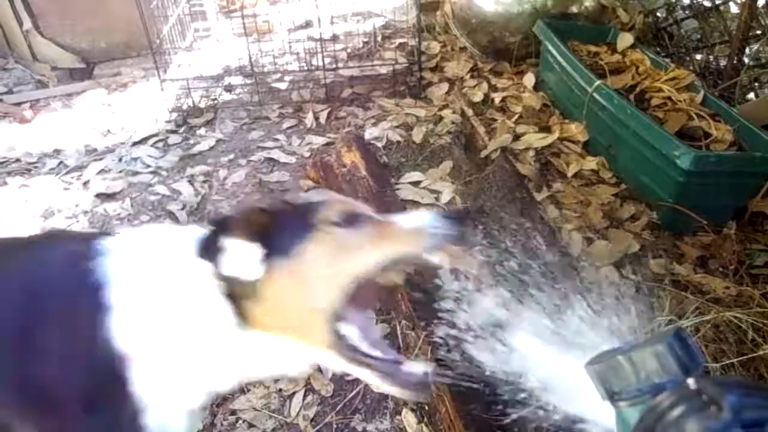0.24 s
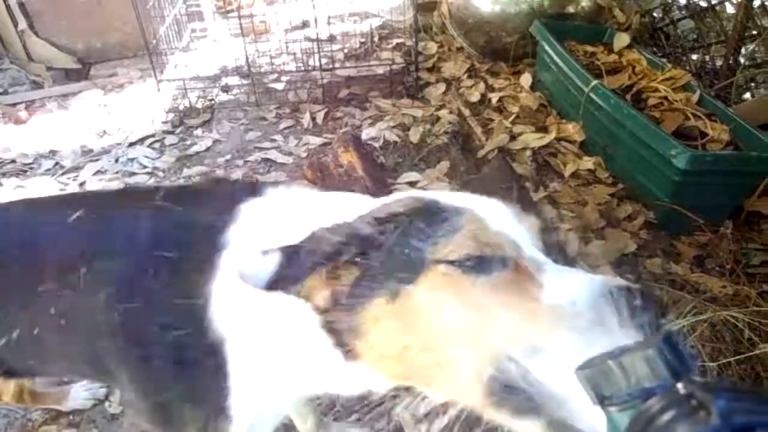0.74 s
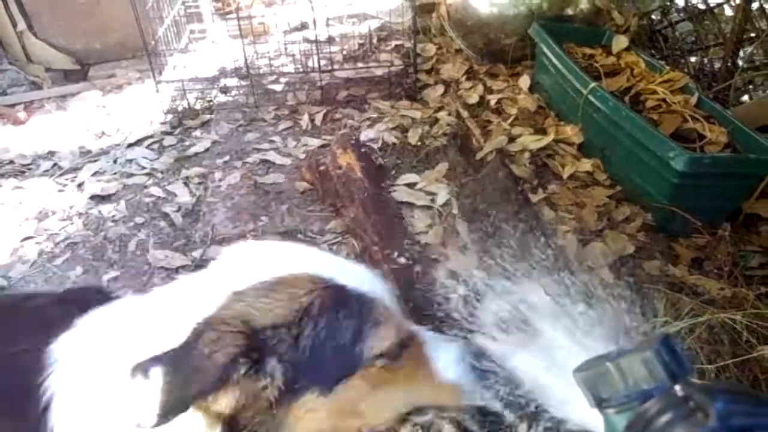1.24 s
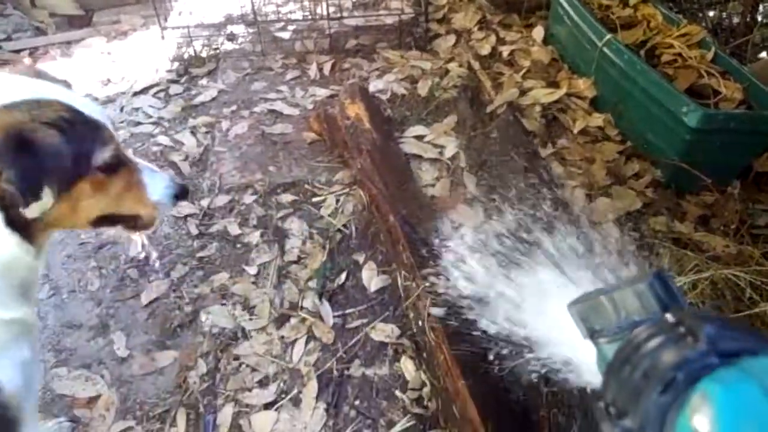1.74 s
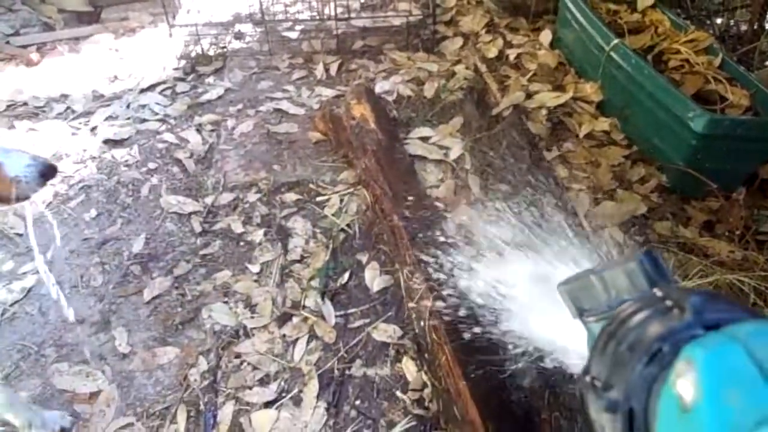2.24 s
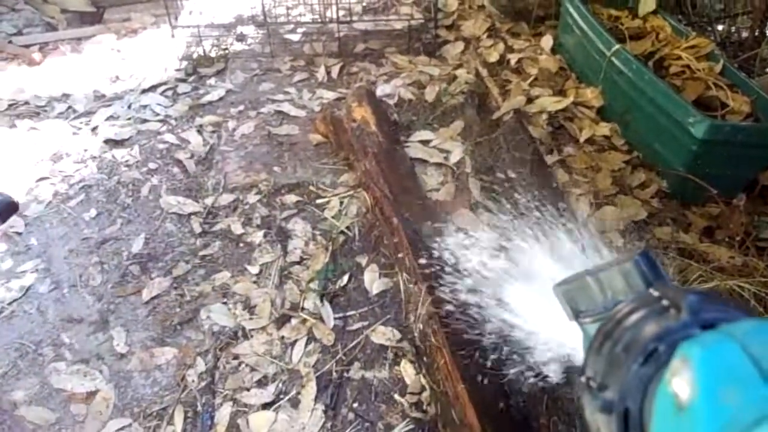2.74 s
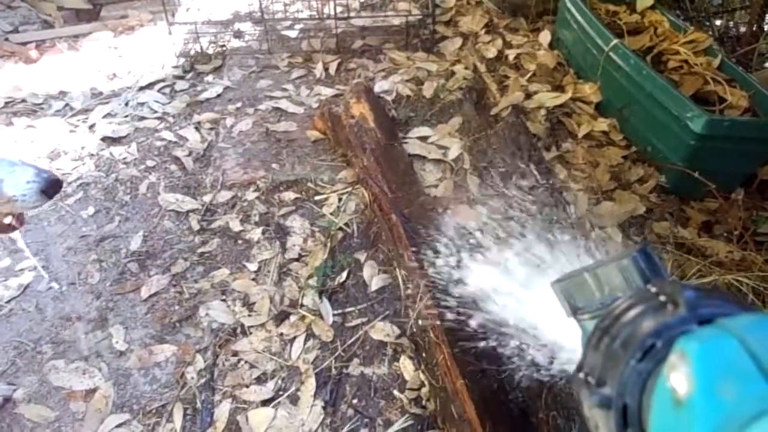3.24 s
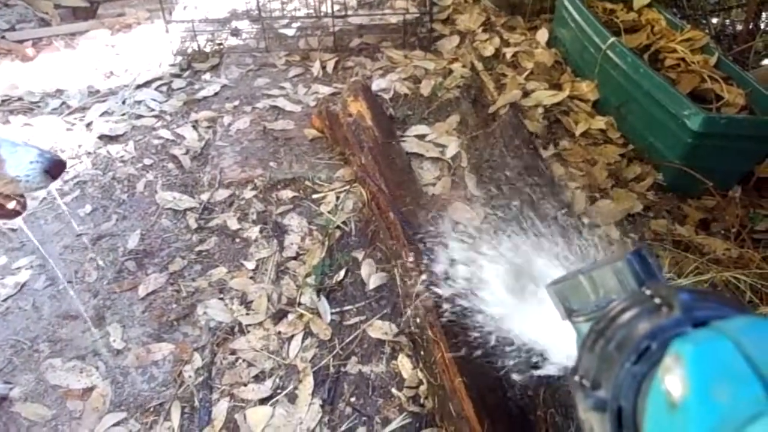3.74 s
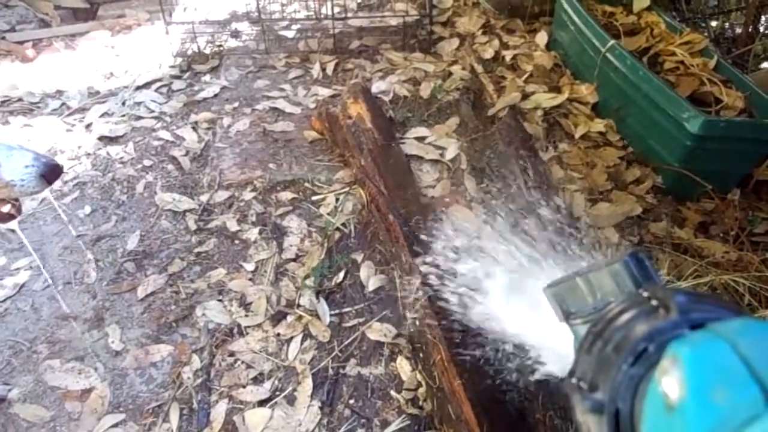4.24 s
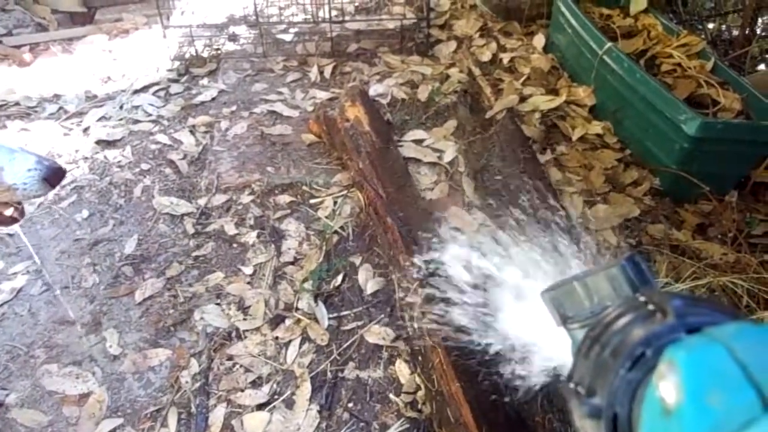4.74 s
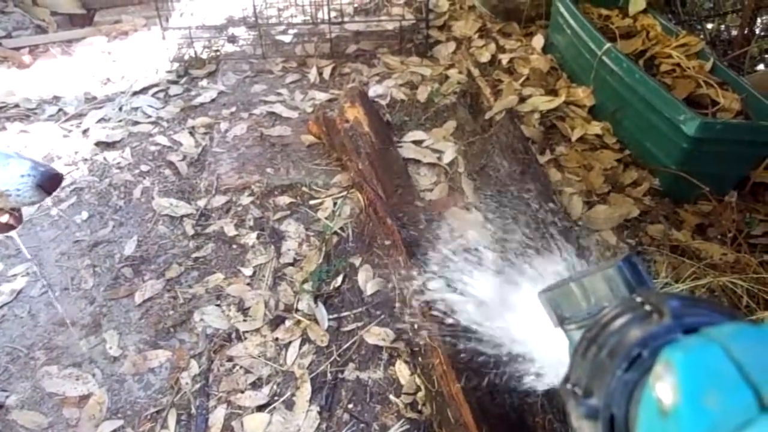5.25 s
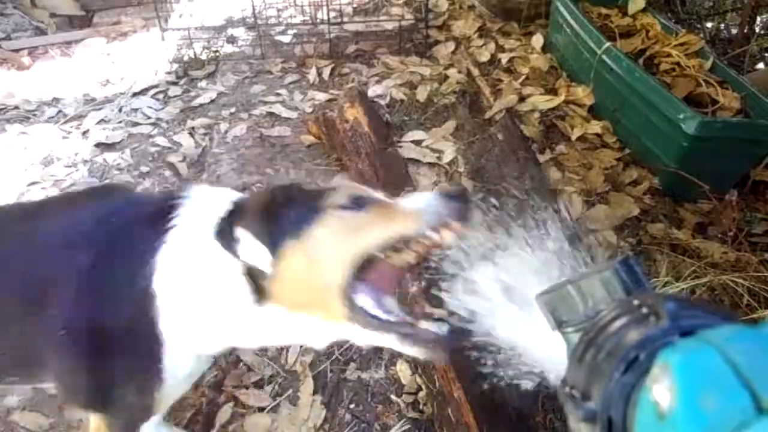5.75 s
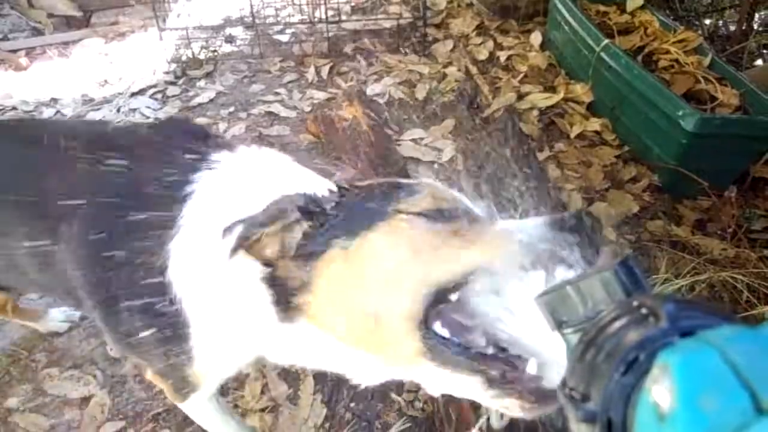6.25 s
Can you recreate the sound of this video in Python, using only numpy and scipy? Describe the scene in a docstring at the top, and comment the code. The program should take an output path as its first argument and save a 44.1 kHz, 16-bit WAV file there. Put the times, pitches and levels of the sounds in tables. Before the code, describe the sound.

Close outdoors, a garden hose nozzle sprays continuously with a bright, sputtering hiss. Droplets crackle on dry leaves and patter dully on soil, with little puddle gurgles. Near the start a dog bites the stream, making low drumming, splashes and a wet snap; after a long stretch of spray alone, it lunges again at the end. Close stereo microphone, no echo.

```python
"""Outdoors, close to a garden hose nozzle that sprays onto dead leaves and wet soil.
The jet sputters: random clumps of tiny blows ring the nozzle's resonances over a hiss.
Filtered blows make droplets crackle on leaves and patter on soil; rising tones gurgle in a puddle.
Twice a dog lunges into the spray: low noise drums in its open mouth, and its jaws snap shut
with short bursts of splash and thud."""
import sys
import numpy as np
from scipy import signal
from scipy.fft import rfft, irfft
from scipy.io import wavfile
from scipy.ndimage import uniform_filter1d

SR = 44100
rng = np.random.default_rng(int(sys.argv[2]) if len(sys.argv) > 2 else 0)


def transcribe(signal):
    """Save signal, clipped to [-1, 1], as a 16-bit WAV file at the path in sys.argv[1]."""
    frames = np.atleast_2d(signal).T
    limited = np.clip(frames, -1, 1)
    pcm = np.round(limited * 32767).astype(np.int16)
    wavfile.write(sys.argv[1], SR, pcm)


N = 285768
T = np.arange(N) / SR  # time of every sample, seconds
HZ = np.fft.rfftfreq(N, 1 / SR)  # frequencies in the spectrum

# how strongly water lands on the soil, before each layer's own adjustment: (time [s], level [dB])
SOIL_LEVEL = [(0.0, -43.5), (1.32, -49.5), (1.71, -44.5), (4.0, -49.5), (4.19, -47.5), (4.96, -53),
              (5.56, -54), (5.96, -53.5), (6.48, -52.5)]


def undb(db):
    """Turn decibels into a gain."""
    return 10 ** (np.asarray(db) / 20)


def unit(x):
    """Scale to an average strength (rms) of 1."""
    return x / np.sqrt(np.mean(x ** 2))


def curve(rows):
    """Turn rows (time [s], level [dB]) into a gain for every sample, with rounded corners."""
    gain = undb(np.interp(T, *np.transpose(rows)))
    return uniform_filter1d(gain, int(0.03 * SR))


def walk(rate):
    """A random wander: about rate new levels a second, smoothed twice and scaled to rms 1."""
    hold = int(SR / rate)  # samples per level
    held = rng.standard_normal(N // 20)[np.arange(N) // hold]
    smooth = uniform_filter1d(held, hold)
    return unit(uniform_filter1d(smooth, hold // 2))


def colour(x, points):
    """Filter to the spectrum (frequency [Hz], level [dB]), with no sound ahead of its cause; rms 1."""
    hz, db = np.transpose(points)
    log_gain = np.log(undb(np.interp(np.log(HZ + 1), np.log(hz), db)))
    # folding the cepstrum onto positive times makes the filter respond only after each blow
    cepstrum = irfft(log_gain, N)
    cepstrum[1:N // 2] *= 2
    cepstrum[N // 2 + 1:] = 0
    response = np.exp(rfft(cepstrum))
    return unit(irfft(rfft(x) * response, N))


def ring(x, hz, width_hz):
    """One resonance, with gain 1 at its centre; a narrow one rings longer."""
    damping = 1j * HZ * width_hz
    return irfft(rfft(x) * damping / (hz ** 2 - HZ ** 2 + damping), N)


def impacts(rate, spread_db):
    """Random tiny blows, about rate a second; most are small and a few large."""
    chance = rng.random(N)
    size = np.minimum(rng.standard_normal(N), 2.5)
    sign = rng.choice([-1, 1], N)
    return unit((chance < rate / SR) * sign * undb(spread_db * size))


def place(x, right_db, lag_samples=0, above_hz=0):
    """Left-right placing: pitches over above_hz are right_db louder at the right and later at the left."""
    share = 1 / (1 + (above_hz / (HZ + 1)) ** 16)  # how fully each pitch is affected
    difference = np.log(undb(right_db)) + 2j * np.pi * HZ * lag_samples / SR
    half = np.exp(share * difference / 2)
    return irfft(rfft(x) * np.array([1 / half, half]), N)


def bursts(rows, attack_s, release_s, sag_db_per_s=0, height=undb):
    """Rows (start s, length s, dB) that rise, hold or sag, and fall; a gain, or dB with height=float."""
    out = np.zeros(N)
    for start, length, db in rows:
        span = slice(max(int(start * SR), 0), int((start + length + release_s) * SR))
        age = T[span] - start
        rise = age / attack_s
        fall = 1 - (age - length) / release_s
        shape = np.clip(np.minimum(rise, fall), 0, 1)
        sag = undb(-sag_db_per_s * (age - length / 2))
        out[span] += height(db) * shape * sag
    return out


def rumble():
    """Low rush of the flow: deep noise, a little stronger when more water reaches the ground."""
    # spectrum of the rush: (frequency [Hz], level [dB])
    rumble_colour = [(12, -18), (28, 0.5), (42, 2.5), (55, -3), (73, -0.5), (95, -4), (160, -7.5),
                     (300, -7.5), (600, -15), (2000, -60)]
    rush = 0
    for side in (-1, 1):
        noise = colour(rng.standard_normal(N), rumble_colour)
        rush = rush + place(noise, right_db=0.9 + 2.6 * side)
    return unit(rush) * unit(curve(SOIL_LEVEL) ** 0.29) * undb(-53.0)


def bubble(hz, decay_s):
    """A bubble rings briefly, and its pitch climbs from hz as it nears the surface."""
    age = T[:3000]
    tone = np.sin(2 * np.pi * hz * age * (1 + 2.16 * age))
    onset = 1 - np.exp(-age / 0.00085)
    return tone * np.exp(-age / decay_s) * onset


def gurgles():
    """Trapped air rings as bubbles: large ones gulp now and then among many small ones."""
    # large bubbles in the puddle and the dog's mouth:
    # (time [s], starting pitch [Hz], level before onset and decay [dB])
    large = [(.079, 734, -33), (.118, 704, -39), (.918, 1190, -34), (1.025, 855, -38), (1.042, 1070, -39),
             (1.625, 803, -32.5), (2.028, 780, -35), (3.127, 685, -33.5), (3.27, 784, -36),
             (4.253, 887, -33), (6.258, 1190, -38), (6.296, 1190, -35)]
    count = 420  # small bubbles
    times = rng.uniform(0, T[-1], size=count)
    pitch, size = rng.standard_normal(size=(2, count))
    small_hz = 720 * np.exp(0.13 * pitch)
    # small bubbles grow louder where more water lands
    small_db = np.interp(times, *np.transpose(SOIL_LEVEL)) + 2.9 + 4.16 * size
    small = zip(times, small_hz, small_db)
    out = np.zeros(2 * N)  # spare room for tails past the end
    for rows, decay_s in ((large, 0.010), (small, 0.006)):
        for s, hz, db in rows:
            ringing = undb(db) * bubble(hz, decay_s)
            start = int(s * SR)
            out[start:start + len(ringing)] += ringing
    return place(out[:N], right_db=0.8)


def soil():
    """Heavier water patters on the soft ground, left and right: dull, randomly sized blows."""
    # spectrum of a blow on soil: (frequency [Hz], level [dB])
    soil_colour = [(100, -13.5), (250, -7.5), (380, -12.5), (520, -2), (700, 2), (850, -2), (1050, -1.5),
                   (1500, -5.5), (2200, -11.5), (4000, -35)]
    patter = 0
    for side in (-1, 1):
        uneven = undb(1.0 * walk(30))
        blows = colour(impacts(rate=800, spread_db=5.5) * uneven, soil_colour)
        patter = patter + place(blows, right_db=0.8 + 1.1 * side)
    return unit(patter) * curve(SOIL_LEVEL) * undb(-0.17)


def spray():
    """Strength of the spray on the leaves: a wavering flow with splashes on top."""
    # steady spray before the adjustment below: (time [s], level [dB])
    spray_level = [(0.0, -27.5), (0.61, -28), (1.39, -28.5), (1.86, -26), (2.65, -29), (3.45, -27.5),
                   (3.84, -29.5), (4.28, -27.5), (4.96, -31), (5.65, -27.5), (6.23, -29.5), (6.48, -26)]
    # splashes, where the fan of water catches the dog or a heap of leaves:
    # (start [s], length [s], level before the leaves' overall gain [dB])
    splashes = [(.225, 0.042, -33), (.445, 0.08, -23), (.57, 0.074, -26.5), (.995, 0.031, -23.5),
                (1.155, .075, -27.5), (2.315, 0.025, -25), (3.56, .11, -27), (4.36, 0.075, -31.5),
                (5.23, 0.03, -30), (5.61, .055, -29), (6.38, 0.13, -27)]
    level_db, waver_db = 2, 0.43
    steady = curve(spray_level) * undb(level_db + waver_db * walk(18))
    return np.hypot(steady, bursts(splashes, attack_s=0.024, release_s=0.026))


def leaves():
    """Droplets tick on dry leaves and fine mist hisses, on both sides of the fan of water."""
    # spectra of the ticks, the mist and the smallest droplets: (frequency [Hz], level [dB])
    leaf_colour = [(500, -32), (1500, -21.5), (3000, -19), (5500, -5.5), (6600, -8), (7700, -4.5),
                   (8800, -2.5), (10000, -4), (12000, -4), (14000, -0.5)]
    mist_colour = [(500, -28), (1500, -15), (3000, -21.5), (5500, -8), (6600, -14.5), (8800, -6.5),
                   (10500, -6), (12000, -4.5), (14000, -1)]
    fine_colour = [(7000, -42), (10000, -20), (12000, -4.5), (14000, -4.5)]
    flow = spray() * undb(1.7 * np.tanh(walk(300)))
    out = 0
    for side in (-1, 1):
        ticks = colour(impacts(rate=800, spread_db=5.5), leaf_colour)
        mist_swell = undb(0.58 * walk(130))
        mist = colour(impacts(rate=15000, spread_db=6.0) * mist_swell, mist_colour)
        # the smallest droplets burst in clusters and sound only at the very top
        clusters = undb(4.5 * np.tanh(walk(240)))
        sizzle = colour(impacts(rate=1200, spread_db=15) * clusters, fine_colour)
        drops = undb(-1.5) * ticks + mist + undb(-2.5) * sizzle
        out = out + place(drops, right_db=1.4 + 3.4 * side, lag_samples=0.19 + 0.12 * side, above_hz=7900)
    return unit(out) * flow * undb(3.5)


def close_drops():
    """Each heavy drop slaps a leaf: a very short burst of bright noise with a fainter, longer tail."""
    # heavy drops that land close by: (time [s], peak level before left-right placing [dB])
    heavy_drops = [(0.247, -6.5), (0.4808, -10), (0.4944, -10), (0.7132, -10), (1.483, -7), (1.5663, -14),
                   (2.0208, -4.5), (2.809, -5.5), (3.0055, -9), (3.1562, -10), (3.2204, -10), (3.2728, -9),
                   (3.4017, -9.5), (3.659, -19), (3.9485, -13), (4.3726, -5.5), (4.3844, -15), (4.783, -10),
                   (5.2437, -7.5), (5.82, -8.5), (5.883, -14), (6.049, -11), (6.3275, -10)]
    out = np.zeros(N)
    age = T[:400]
    leaf = signal.butter(2, [7800, 14000], "band", fs=SR, output="sos")
    fade = np.exp(-age / 0.00021) + 0.19 * np.exp(-age / 0.0035)  # slap, then tail
    grains = rng.standard_normal((len(heavy_drops), len(age)))
    for (s, peak_db), grain in zip(heavy_drops, grains):
        splat = signal.sosfilt(leaf, grain * fade)
        start = int(s * SR)
        out[start:start + len(age)] += undb(peak_db) * splat / abs(splat).max()
    return place(out, right_db=1.4, lag_samples=0.25, above_hz=8000)


def dog():
    """Water drums on tongue and cheeks; each snap thuds and squeezes a splash through a ringing mouth."""
    # bouts of drumming in the open mouth: (start [s], length [s], level [dB])
    mouth_bouts = [(.455, 0.12, -43.5), (.675, 0.12, -49), (5.70, .17, -52), (5.96, 0.25, -51.5)]
    # spectrum of the drumming: (frequency [Hz], level [dB])
    mouth_colour = [(30, -28), (55, -16), (76, 0), (130, -5), (200, -10), (350, -20), (1000, -50)]
    # resonances of the wet mouth: (pitch [Hz], width [Hz], level [dB])
    jaw_modes = [(663, 66, -3), (900, 230, -3), (1190, 210, 4), (1610, 690, -9)]
    # jaws closing on the water: (time [s], splash level [dB], thud level [dB], length [s])
    snaps = [(0.565, -45, -48, 0.059), (1.183, -33, -44, 0.015), (5.768, -45, -41.5, 0.046),
             (6.43, -36, -47, 0.019)]
    inside = bursts(mouth_bouts, attack_s=0.021, release_s=0.04)
    out = colour(rng.standard_normal(N), mouth_colour) * inside
    splash = 0
    for hz, width, db in jaw_modes:
        once = ring(rng.standard_normal(N), hz, width)
        splash = splash + undb(db) * ring(once, hz, width)
    splash = unit(splash)
    thud = unit(ring(ring(rng.standard_normal(N), 260, 300), 260, 300))
    for s, splash_db, thud_db, length in snaps:
        squeeze = np.exp(-2 * (2 * (T - s) / length - 0.6) ** 2)  # a smooth hump just after s
        out = out + squeeze * (undb(splash_db) * splash + undb(thud_db) * thud)
    return place(out, right_db=1.0)


def sputter():
    """Strength of the jet: a fluttering flow with stalls, surges set off by lulls, and spits of air."""
    # jet between its surges, before flutter and dips: (time [s], level [dB])
    jet_level = [(0.0, -29.5), (1.06, -32.5), (1.82, -28.5), (2.69, -31), (3.47, -28.5), (3.84, -30),
                 (4.58, -30), (5.11, -31.5), (5.47, -31), (6.48, -30.5)]
    # surges: (start [s], length [s], level halfway through, before the adjustment below [dB])
    surge_rows = [(0.068, 0.038, -26.5), (0.143, 0.1, -27), (0.244, 0.031, -25), (0.305, 0.072, -23.5),
                  (0.429, 0.083, -23.5), (1.285, 0.037, -27.5), (1.477, 0.021, -25), (1.6, 0.078, -25),
                  (1.767, 0.04, -26), (1.838, 0.056, -24.5), (1.912, 0.031, -25), (1.974, 0.074, -24.5),
                  (2.139, 0.025, -21.5), (2.207, 0.078, -27), (2.334, 0.017, -28), (2.368, 0.043, -28),
                  (2.74, 0.1, -26.5), (3.055, 0.088, -23.5), (3.329, 0.094, -25.5), (3.543, 0.035, -31),
                  (3.589, 0.12, -25.5), (3.881, 0.053, -25), (4.168, 0.053, -22.5), (4.426, 0.14, -23.5),
                  (4.571, 0.059, -25.5), (4.634, 0.04, -24), (4.742, 0.12, -27), (5.105, 0.032, -25.5),
                  (5.333, 0.22, -26), (5.692, 0.027, -25.5), (5.731, 0.041, -26), (6.451, 0.036, -25)]
    # moments when the jet stalls: (start [s], length [s], depth [dB])
    stalls = [(.52, .025, -5), (.905, 0.044, -4), (1.04, 0.025, -5), (1.24, 0.035, -4), (3.79, 0.028, -11),
              (4.945, 0.038, -6), (6.175, 0.037, -5.5)]
    # air pockets that spit from the nozzle: (time [s], level [dB], decay [s])
    spit_rows = [(2.377, -18.5, 0.006), (2.398, -29, 0.005), (4.757, -33, 0.013)]
    # the jet chokes for a moment before each surge and slackens after it
    lull_s, edge_s, choke_db, lull_db = 0.022, 0.0092, -0.5, -1
    chokes = [(start - lull_s, lull_s, choke_db) for start, _, _ in surge_rows]
    lulls = [(start + length, lull_s, lull_db) for start, length, _ in surge_rows]
    dips_db = bursts(chokes + lulls + list(stalls), edge_s, edge_s, height=float)
    # between surges the jet flutters at random
    flutter_db = 2.5 * np.tanh(walk(60))
    steady = curve(jet_level) * undb(-0.02 + dips_db + flutter_db)
    # a surge jumps up, sags while it lasts and breaks off
    surges = undb(-0.2) * bursts(surge_rows, attack_s=0.01, release_s=0.0074, sag_db_per_s=19)
    spits = sum(undb(db) * (T >= s) * np.exp(-abs(T - s) / decay) for s, db, decay in spit_rows)
    return np.hypot(np.maximum(steady, surges), spits)


def jet():
    """Air pockets burst in the nozzle in quick clumps and ring its cavities over a broad hiss."""
    # resonances of the nozzle: (pitch [Hz], width [Hz], level [dB])
    nozzle_modes = [(2307, 460, -10), (2626, 140, -1), (2840, 290, -1.5), (3130, 21, -7),
                    (3280, 420, -11.5), (4120, 660, -14), (4620, 130, -9.5), (4980, 26, -8),
                    (5070, 200, -9)]
    # spectrum of the hiss: (frequency [Hz], level [dB])
    jet_hiss = [(900, -31), (1600, -10), (2200, -12), (3000, 1), (5000, -4.5), (6300, -11), (9000, -12),
                (14000, -21.5)]
    drive = sputter()
    clumps = undb(0.62 * np.tanh(walk(90)) + 3.9 * np.tanh(walk(300)))
    rings = 0
    for hz, width, db in nozzle_modes:
        pops = impacts(rate=3000, spread_db=3.0) * clumps
        rings = rings + undb(db) * ring(pops, hz, width)
    # the small opening radiates no bass, and the cavities little above their top resonance
    opening = signal.butter(2, [1900, 6000], "band", fs=SR, output="sos")
    cavities = unit(signal.sosfilt(opening, rings))
    hiss = colour(impacts(rate=12000, spread_db=2.5) * clumps, jet_hiss)
    # the hiss follows the flow itself, which swings less than the sputter
    flow = np.sqrt(drive * drive.mean())
    sound = undb(-0.8) * cavities * drive + undb(-6.0) * hiss * flow
    # the main cavity leans to the right, wavering as the fan of water moves
    main_cavity = ring(ring(sound, 2650, 480), 2650, 480)
    beam = main_cavity * (0.095 + 0.1 * walk(300))
    return sound + np.array([-beam, beam])


def scene():
    """Ground, leaves, dog and nozzle, in the open air with no echo."""
    return rumble() + gurgles() + soil() + leaves() + close_drops() + dog() + jet()


def record(dry):
    """The recorder cuts the top steeply."""
    top_hz = 14230
    steep_cut = signal.ellip(16, 0.1, 80, top_hz, fs=SR, output="sos")
    return signal.sosfilt(steep_cut, dry)


dry = scene()
out = record(dry)
transcribe(out)
```